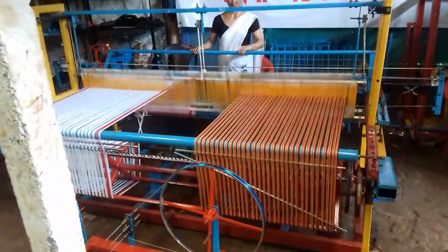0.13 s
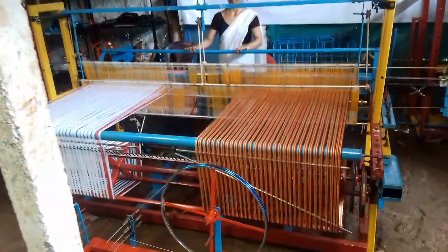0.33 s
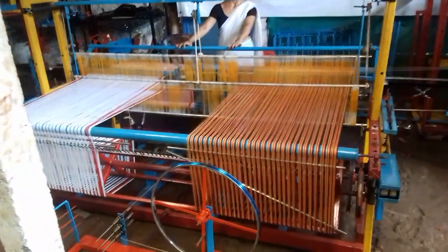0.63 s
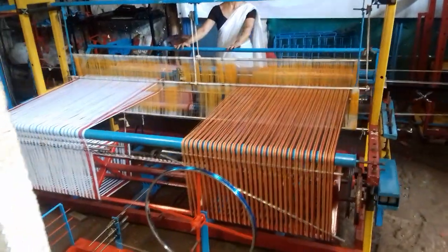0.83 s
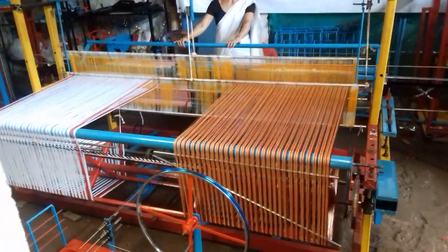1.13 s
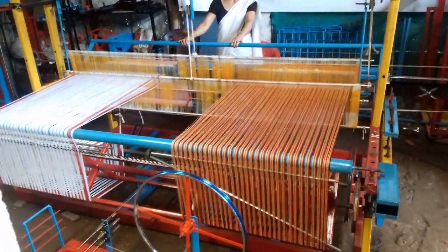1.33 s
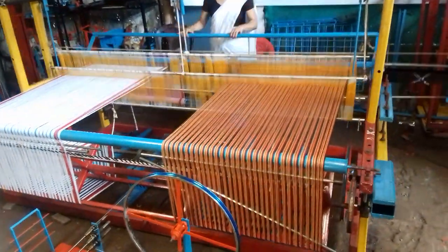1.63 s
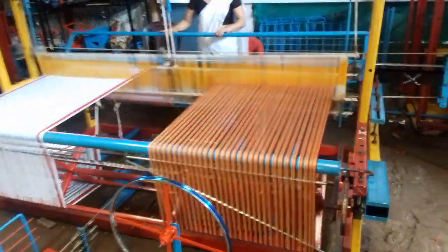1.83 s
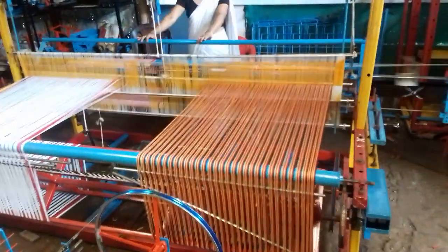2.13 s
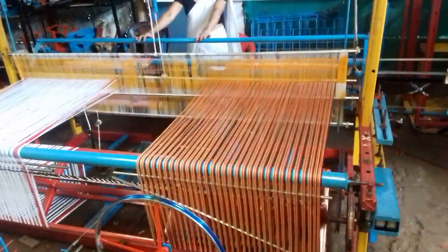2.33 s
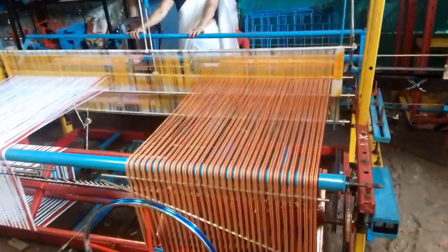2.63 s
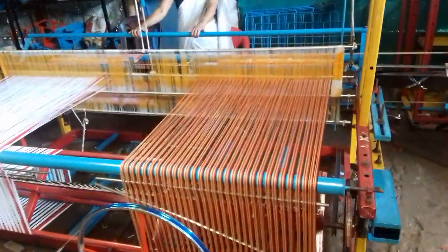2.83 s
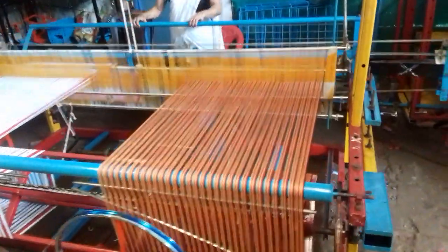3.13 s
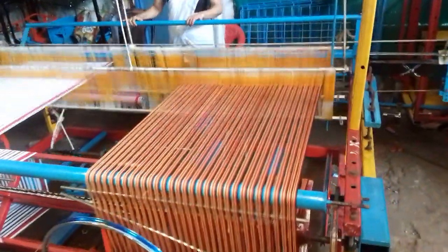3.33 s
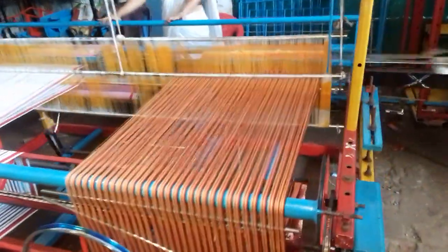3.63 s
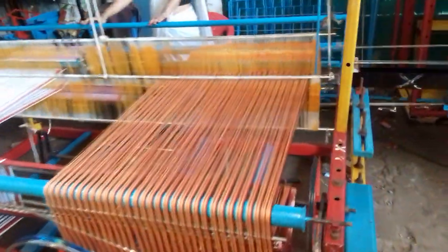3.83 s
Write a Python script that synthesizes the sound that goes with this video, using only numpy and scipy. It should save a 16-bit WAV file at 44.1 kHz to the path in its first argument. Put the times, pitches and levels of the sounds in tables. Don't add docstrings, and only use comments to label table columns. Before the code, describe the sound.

Loud, bright loom racket throughout: dense clacks and rattles, a short lull around 1.4 seconds, renewed clatter, another lull near 3 seconds, then more crashes; close, thin, slightly overloaded phone sound in a workshop.

```python
import sys
import numpy as np
from scipy import signal
from scipy.io import wavfile
from scipy.ndimage import uniform_filter1d

SR = 44100
rng = np.random.default_rng(int(sys.argv[2]) if len(sys.argv) > 2 else 0)


def how_loud(loudness_db):
    steps = np.asarray(loudness_db, float) / 20
    return 10 ** steps


def bounce(signal):
    frames = np.transpose(np.atleast_2d(signal))
    limited = np.clip(frames, -1, 1)
    pcm = np.round(limited * 32767).astype(np.int16)
    wavfile.write(sys.argv[1], SR, pcm)


N = 176400
CONTACT_S = 0.0008


def read(points, hz):
    f, value = np.transpose(points)
    return np.interp(np.log(hz + 1), np.log(f + 1), value)


def evened(x):
    return x / np.sqrt(np.mean(x ** 2) + 1e-20)


def curve(points):
    s, db = np.transpose(points)
    return how_loud(np.interp(np.arange(N) / SR, s, db))


def colour(x, gain_db):
    hz = abs(np.fft.fftfreq(4096, 1 / SR))
    log_gain = np.log(how_loud(np.maximum(gain_db(hz), -120)))
    taps = np.fft.ifft(np.exp(np.conj(signal.hilbert(log_gain)))).real[:2048]
    return signal.oaconvolve(x, taps / np.linalg.norm(taps))[:N]


def add(mix, s, sound):
    part = mix[round(s * SR):][:len(sound)]
    part += sound[:len(part)]


def impacts(per_s, spread_db, size=N):
    height = how_loud(spread_db * np.minimum(rng.exponential(1, size), 4))
    height = height * rng.choice([-1., 1.], size)
    return evened(height * (rng.random(size) < per_s / SR))


def bursts(times, db, t60, rise_s):
    power, t = np.zeros(N), np.arange(SR // 2) / SR
    for s, level, ring in zip(times, db, t60):
        decay = how_loud(level - 60 * t / np.clip(ring, 0.02, 2))
        add(power, s, (np.minimum(t / rise_s, 1) * decay) ** 2)
    return np.sqrt(power)


def struck(modes, uneven_db, spread):
    t, ring = np.arange(SR // 4) / SR, 0
    for (hz, db, t60), (a, b) in zip(modes, rng.standard_normal((len(modes), 2))):
        envelope = how_loud(db + uneven_db * a - 60 * t / t60)
        ring = ring + envelope * np.sin(2 * np.pi * hz * (1 + spread * b) * t)
    ring = ring * (1 - np.exp(-(t / CONTACT_S) ** 2))
    return ring / np.linalg.norm(ring)


def shaken(hz, width, level):
    carrier = np.exp(2j * np.pi * np.cumsum(hz * np.ones(N)) / SR)
    r = np.exp(-np.pi * width / SR)
    envelope = signal.lfilter([1], [1, -2 * r, r * r], impacts(500, 3) / carrier)
    return curve(level) * evened((carrier * envelope).real)


# [t/s, peak level/dB, relative low body level/dB, chatter T60/s]
CLACK_EVENTS = [(0.162, -12, 3, 0.23), (0.194, 0, -10, 0.61), (0.2804, -13.5, -3.5, 0.22),
                (0.6478, -10, -1, 0.99), (0.7426, -4, -27, 0.42), (1.0277, -2, -6.5, 0.28),
                (1.1395, -7.5, -2.5, 0.21), (1.1886, -19, 5, 0.46), (1.403, -21.5, -12.5, 0.47),
                (1.7593, -7.5, -3, 0.39), (1.7945, -11, -34, 0.8), (2.2203, -2, -9, 0.42),
                (2.34, -2.5, -9, 0.46), (2.4093, -3, -5, 0.22), (2.5894, -10.5, -4, 1),
                (2.7475, -18.5, 6.5, 0.35), (2.786, -13.5, 0.5, 0.31), (2.8474, -9.5, -11, 0.13),
                (3.304, -10, -2, 0.76), (3.3322, -6.5, -4.5, 0.13), (3.408, -5.5, -8, 0.21),
                (3.5999, -14, 9, 0.21), (3.757, -7, -3.5, 1), (3.892, -2.5, -39, 0.76)]
# [t/s, peak level/dB, relative low body level/dB, chatter
# T60/s]
SWELL_EVENTS = [(0.2194, -11, -24, 0.22), (0.5018, 1, -9, 0.24), (0.599, -2, -3, 0.17),
                (0.801, -9, 1, 0.49), (0.8794, -12, -24, 0.9), (0.9996, -13.5, -1, 0.9),
                (1.4394, -24.5, -34, 0.4), (1.8694, -11.5, -11, 0.67), (2.088, -3, -4.5, 0.77),
                (2.2694, -8, -3.5, 0.84), (2.6614, -4, -14, 0.16), (2.9394, -16, -47, 0.46),
                (3.349, -1.5, -11, 0.43), (3.633, -6.5, -8.5, 1), (3.836, 1, -22, 0.22),
                (3.9494, -27, -24.5, 0.3)]
# [f/Hz, density level/dB per Hz]
STEEL_SPECTRUM = [(290, -60), (500, -22), (1040, -2), (3000, 5.5), (5000, -4), (6600, -1), (8600, -11.5),
                  (15500, -34.5)]


def clacks(rows, rise_s):
    out = np.zeros(N)
    chatter = colour(impacts(4000, 3.5), lambda hz: read(STEEL_SPECTRUM, hz))
    low = signal.butter(3, 4500, fs=SR, output="sos")
    high = signal.butter(3, 9500, "high", fs=SR, output="sos")
    plates = [(hz, 0, 0.035) for hz in np.geomspace(700, 14000, num=50)]
    plate_share, clack_db, sizzle_db, sizzle_t60 = 0.56, -8, 4, 0.63
    for s, db, body_db, t60 in rows:
        at = round(s * SR)
        drive = chatter[at:at + SR // 2]
        drive = drive * bursts([0], [db + clack_db], [t60], rise_s)[:len(drive)]
        ring = signal.fftconvolve(drive, struck(plates, 6, 0.04))[:len(drive)]
        blow = drive + plate_share * ring
        body, sizzle = signal.sosfiltfilt(low, blow), signal.sosfiltfilt(high, blow)
        clang = blow - body - sizzle
        fade = how_loud(sizzle_db - 60 * np.arange(len(blow)) / SR / sizzle_t60)
        add(out, s, clang + how_loud(body_db) * body + fade * sizzle)
    return out


# [t/s, peak level/dB, chatter T60/s]
KNOCK_EVENTS = [(0.451, 0, 0.72), (0.512, 3, 0.16), (0.907, -0.5, 0.31), (1.393, -18, 0.8),
                (1.573, -12.5, 0.8), (1.796, -8, 0.38), (1.966, -11, 0.54), (2.037, -7, 0.66),
                (2.104, -3, 0.4), (2.421, -2, 0.39), (3.346, -9, 0.49), (3.559, -7.5, 0.4),
                (3.598, 0, 0.54), (3.667, 0.5, 0.2), (3.799, -16, 0.81)]
# [f/Hz, level/dB, T60/s]
SLEY_MODES = [(711, -22, 0.098), (938, -7, 0.037), (1115, -3.5, 0.028), (1330, 0.5, 0.033),
              (1620, 7.5, 0.009), (1893, -16.5, 0.026), (2540, -5, 0.011)]


def knocks():
    out, hits, knock_db = np.zeros(N), impacts(1500, spread_db=4), -13.5
    for s, db, t60 in KNOCK_EVENTS:
        at = round(s * SR)
        envelope = bursts([s], [db + knock_db], [t60], rise_s=0.0066)
        drive = (hits * envelope)[at:at + SR // 2]
        add(out, s, signal.fftconvolve(drive, struck(SLEY_MODES, 3, 0.05))[:len(drive)])
    return out


# [t/s, peak level/dB, chatter T60/s, spectral tilt/dB per octave]
CHAIN_JOLTS = [(0.0, -18.5, 0.71, -5.7), (0.059, -24.5, 0.4, 18), (0.194, -10.5, 0.23, 2),
               (0.3796, -22, 1, 0.5), (0.519, -15.5, 0.82, 6), (0.9224, -15.5, 0.51, 0),
               (1.5927, -14.5, 0.32, 0), (1.6294, -16.5, 0.16, -2.5), (1.953, -10.5, 0.2, 1),
               (2.0424, -12.5, 0.79, 1), (2.1186, -4.5, 0.17, 1), (2.2196, -28, 0.88, .1),
               (2.41, -23.5, 1, 3), (3.0937, -19, 0.21, -2), (3.235, -20.5, 0.19, -0.3),
               (3.4694, -17.5, 1, .1), (3.6344, -21, 0.83, 1.5), (3.7279, -27, 0.36, 1.5),
               (3.8581, -21, 0.35, 13)]
# [f/Hz, level/dB, T60/s]
LINK_MODES = [(1380, -2, .12), (1772, -9, 0.12), (2407, -9, .2), (3400, -3.5, 0.24), (4240, -3, 0.14),
              (4914, -8, 0.33), (6296, 0.5, 0.13), (7130, -3, 0.35), (7520, -3.5, 0.13), (7960, -7, 0.19),
              (9200, -15, 0.14), (10430, -20, .15), (11050, -20, 0.1), (12500, -29.5, 0.087)]


def chain():
    out, size = np.zeros(N), SR // 2
    jolt_db, overtones_db, sustain = -11, -25.5, 1.25
    overtones_hz = np.geomspace(2000, 15000, num=14)
    weak = [(hz, overtones_db - 6 * np.log2(hz / 5000), 0.15) for hz in overtones_hz]
    for s, db, t60, tilt_db in CHAIN_JOLTS:
        shake = bursts([0], [db + jolt_db], [t60], 0.0041)[:size]
        modes = [(hz, level + tilt_db * np.log2(hz / 4000), ring * sustain)
                 for hz, level, ring in LINK_MODES + weak]
        for link in range(5):
            drive = impacts(300, spread_db=5.5, size=size) * shake
            ring = struck(modes, uneven_db=3.2, spread=0.01)
            add(out, s, signal.fftconvolve(drive, ring)[:size])
    return out


# [t/s, peak level/dB, f/Hz]
SNAP_EVENTS = [(0.162, -22, 9030), (0.194, -10, 8500), (0.2764, -16.5, 11100), (0.5023, -16, 8600),
               (0.5646, -18, 9200), (0.6449, -20, 8980), (0.7432, -7.5, 10300), (0.9194, -18, 8920),
               (0.9996, -20, 9100), (1.0164, -18, 9200), (1.1408, -25, 9300), (1.1894, -36, 8900),
               (1.4022, -43, 8800), (1.5489, -31, 9350), (1.7424, -25, 8850), (1.7604, -13, 8300),
               (1.7948, -21, 8600), (1.8766, -24, 8550), (1.9884, -18, 9600), (2.1074, -20, 8930),
               (2.2189, -7, 8740), (2.2954, -17, 9000), (2.3421, -15, 8500), (2.3605, -10, 9100),
               (2.4084, -18, 9500), (2.4424, -24, 9100), (2.5326, -23, 9100), (2.591, -29, 8910),
               (2.6489, -19, 9400), (2.7691, -46, 8600), (2.8444, -24, 9400), (3.2345, -28, 8900),
               (3.3064, -27, 8400), (3.3303, -21, 9050), (3.4096, -21, 8660), (3.6197, -14, 9280),
               (3.6334, -12, 8730), (3.7209, -16, 10000), (3.7599, -12, 8700), (3.8926, -6.5, 10140)]


def snaps():
    out, t = np.zeros(N), np.arange(SR // 10) / SR
    snap_db, crack_t60, ring_db, ring_t60 = -4, 0.011, -8.5, 0.032
    bright = signal.butter(2, [6500, 11500], "band", fs=SR, output="sos")
    for s, db, hz in SNAP_EVENTS:
        crack = signal.sosfilt(bright, rng.standard_normal(len(t))) * how_loud(-60 * t / crack_t60)
        ring = sum(np.sin(2 * np.pi * hz * k * t) for k in rng.uniform(0.97, 1.03, 2))
        add(out, s, how_loud(db + snap_db) * (crack + how_loud(ring_db - 60 * t / ring_t60) * ring))
    return out


# [t/s, peak level/dB, f/Hz, T60/s]
PING_EVENTS = [(0.697, -11, 8500, 0.039), (0.706, -15.5, 7020, 0.1), (.76, -21.5, 9200, .2),
               (0.928, -19.5, 7250, 0.56), (3.536, -24, 7970, 0.56), (3.643, -18, 7120, 0.51),
               (.0, -36, 5070, 0.53), (.0, -34.5, 7960, 0.27), (.0, -30, 3400, .5),
               (2.36, -23, 12500, 0.082), (3.237, -36, 6320, 0.48)]


def ticks():
    out, t, wobble_db = np.zeros(N), np.arange(SR // 3) / SR, 4
    for s, db, hz, t60 in PING_EVENTS:
        wobble = evened(uniform_filter1d(rng.standard_normal(len(t)), size=250))
        envelope = how_loud(db - 60 * t / t60 + wobble_db * wobble) * np.minimum(t / CONTACT_S, 1)
        add(out, s, envelope * np.sin(2 * np.pi * hz * t + wobble))
    return out


# [t/s, level/dB]
RUSTLE_LEVEL = [(0, -28.5), (.16, -31), (.45, -25), (1.15, -25), (1.36, -69), (1.56, -39), (1.8, -30.5),
                (2.5, -24.5), (2.88, -68), (3.05, -38.5), (3.28, -39), (3.4, -31), (4, -21)]
# [f/Hz, density level/dB per Hz]
HEDDLE_SPECTRUM = [(350, -81), (600, -18), (927, -10), (2540, -6.5), (6400, -15.5), (15500, -45)]


def rustle():
    taps = colour(impacts(7000, spread_db=0.5), lambda hz: read(HEDDLE_SPECTRUM, hz))
    wires = [(hz, read(HEDDLE_SPECTRUM, hz), 0.07) for hz in np.geomspace(900, 11000, num=60)]
    rings = 0
    for group in range(4):
        hits = impacts(150, spread_db=-2.5)
        rings = rings + signal.oaconvolve(hits, struck(wires, 6.2, 0.0373))[:N]
    return curve(RUSTLE_LEVEL) * (taps + 0.77 * evened(rings))


# [t/s, level/dB]
BAR_LEVEL = [(0, -62), (.7, -27.5), (.85, -22.5), (1.15, -29), (1.25, -35), (1.42, -39), (1.55, -78),
             (2.2, -86), (2.3, -45), (2.8, -23.5), (3, -51.5), (3.2, -40.5), (3.8, -40), (4, -22.5)]
# [t/s, f/Hz]
BAR_PITCH = [
    (0, 2478),
    (.95, 2478),
    (1.13, 2515),
    (1.25, 2490),
    (1.4, 2465),
    (2.7, 2480),
    (4, 2470),
]


def bar():
    hz = np.interp(np.arange(N) / SR, *np.transpose(BAR_PITCH))
    return shaken(hz, 70, BAR_LEVEL)


# [t/s, level/dB]
SHUTTLE_LEVEL = [
    (2.55, -73),
    (2.62, -32),
    (2.78, -24.5),
    (2.87, -30),
    (2.95, -79),
]


def shuttle():
    return shaken(1630, 220, SHUTTLE_LEVEL)


# [t/s, level/dB]
FRAME_LEVEL = [
    (0, -52),
    (.5, -50),
    (1.5, -62),
    (2.45, -51),
    (2.599, -42.5),
    (2.8, -70),
    (3.55, -55),
    (3.66, -38),
    (4, -60),
]
# [t/s, level/dB]
BEAM_LEVEL = [
    (0, -49),
    (1.1, -52.5),
    (1.4, -64.5),
    (2.2, -55),
    (4, -57),
]


def frame():
    return shaken(329, 36, FRAME_LEVEL) + shaken(391.3, 43, BEAM_LEVEL)


# [t/s, length/s, level/dB, f/Hz]
CREAK_EVENTS = [
    (1.468, .075, -36.5, 665),
    (1.562, 0.023, -31, 810),
    (3.03, 0.038, -36, 667),
    (3.105, 0.056, -35.5, 852),
    (3.14, 0.048, -30, 1330),
]


def creaks():
    out = np.zeros(N)
    for s, length, db, hz in CREAK_EVENTS:
        t = np.arange(0, length, 1 / SR)
        drift = evened(uniform_filter1d(rng.standard_normal(SR // 5), size=600))[:len(t)]
        swell = np.sqrt(abs(np.sin(np.pi * t / length)))
        add(out, s, how_loud(db) * swell * np.sin(2 * np.pi * hz * t + 0.44 * drift))
    return out


# [f/Hz, T60/s]
SHED_DECAY = [(300, 0.4), (1500, 0.7), (5000, 0.77), (12000, 0.56)]


def room(x):
    taps = np.zeros(SR)
    at = np.arange(300, SR - 20, 20)
    taps[at + rng.integers(0, 20, len(at))] = rng.choice([-1., 1.], len(at))
    hz, t, z = signal.stft(taps, SR, nperseg=256)
    decay = how_loud(-60 * t / np.maximum(read(SHED_DECAY, hz), 0.05)[:, None])
    tail = signal.istft(z * decay, SR, nperseg=256)[1]
    return signal.fftconvolve(x, tail / np.linalg.norm(tail))[:N]


# [f/Hz, density level/dB per Hz]
MURMUR_SPECTRUM = [(30, -28.5), (200, -14.5), (670, -6.5), (1100, -0.5), (2500, -10), (6500, -47),
                   (10000, -48), (15500, -75)]


def murmur():
    return how_loud(-41.5) * colour(rng.standard_normal(N), lambda hz: read(MURMUR_SPECTRUM, hz))


def scene():
    loom = clacks(CLACK_EVENTS, rise_s=0.00072) + clacks(SWELL_EVENTS, rise_s=0.012)
    loom = loom + knocks() + chain() + snaps() + ticks() + rustle()
    loom = loom + bar() + shuttle() + frame() + creaks()
    room_db, rest_s, rest_length_s, rest_db = -8, 2.197, 0.022, -9
    near, t = loom + how_loud(room_db) * room(loom), np.arange(N) / SR
    resting = (t > rest_s) & (t < rest_s + rest_length_s)
    hush_db = uniform_filter1d(rest_db * resting, size=100)
    return (near * how_loud(hush_db))[None]


def band_limit(x):
    return signal.sosfilt(signal.butter(12, 15860, fs=SR, output="sos"), x)


def record(dry):
    limit = 1.02
    limited = limit * np.tanh(dry / limit)
    thin = signal.sosfilt(signal.butter(3, 283, "high", fs=SR, output="sos"), limited)
    heard = signal.sosfilt(signal.butter(4, 14400, fs=SR, output="sos"), thin + murmur())
    return band_limit(heard)


dry = scene()
out = record(dry)
bounce(out)
```